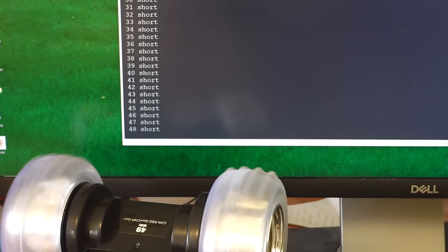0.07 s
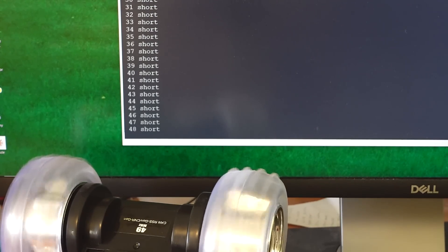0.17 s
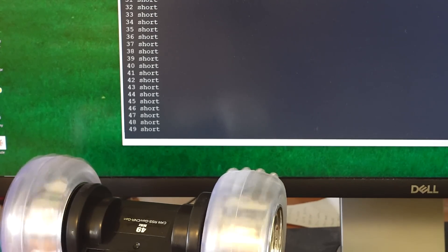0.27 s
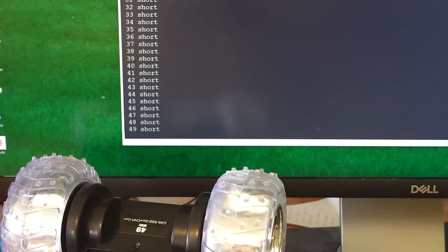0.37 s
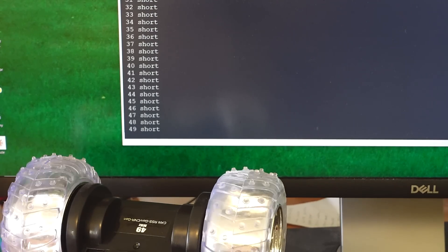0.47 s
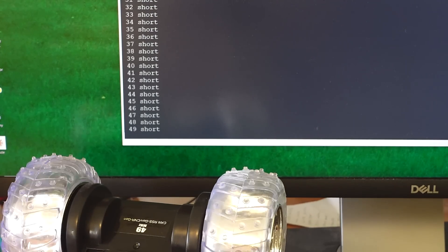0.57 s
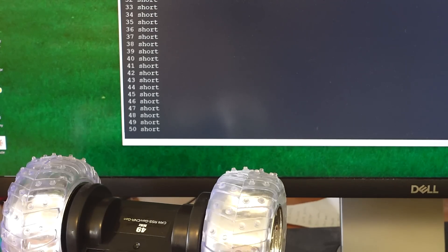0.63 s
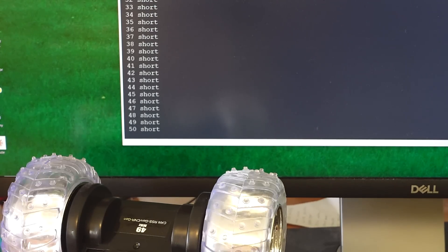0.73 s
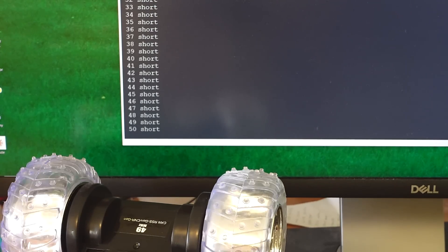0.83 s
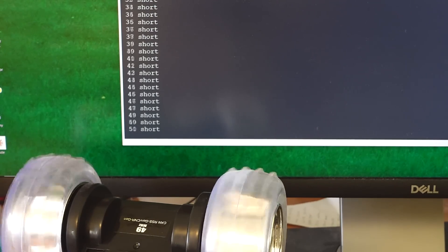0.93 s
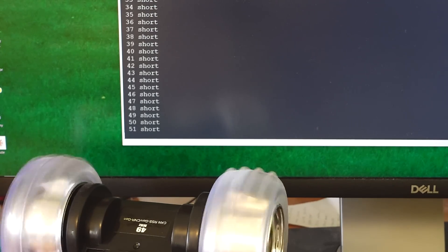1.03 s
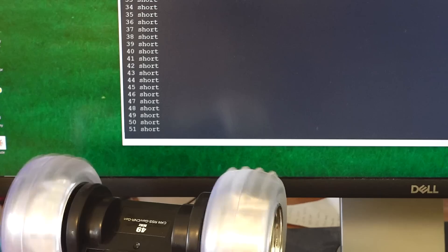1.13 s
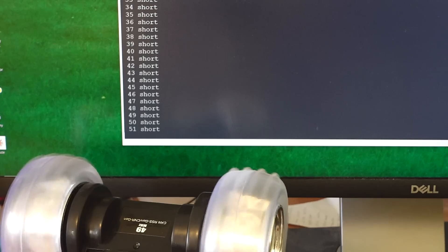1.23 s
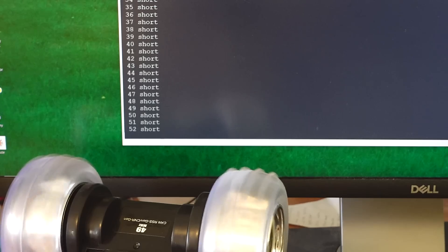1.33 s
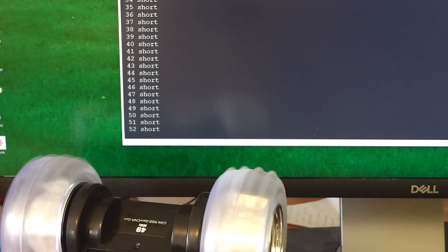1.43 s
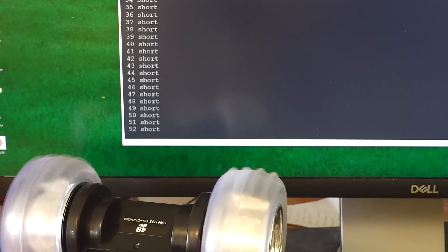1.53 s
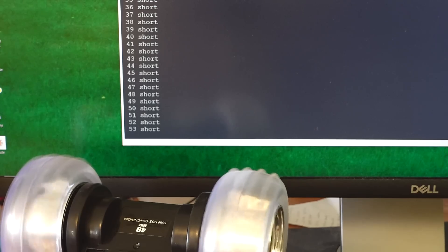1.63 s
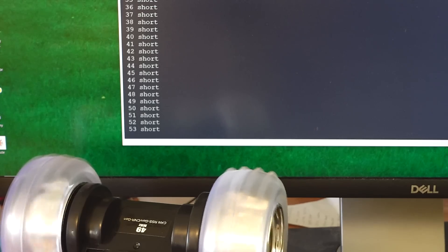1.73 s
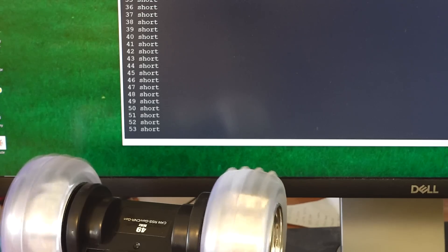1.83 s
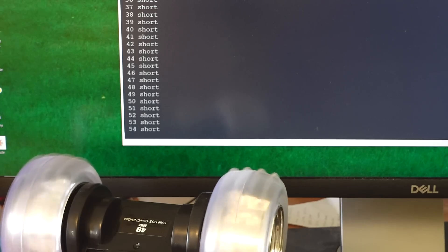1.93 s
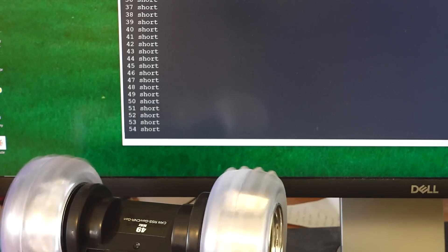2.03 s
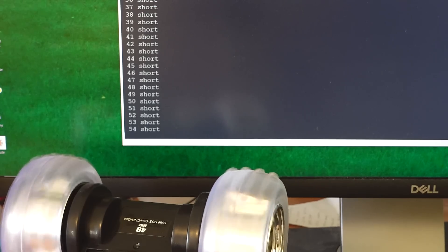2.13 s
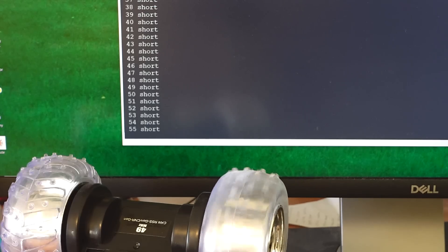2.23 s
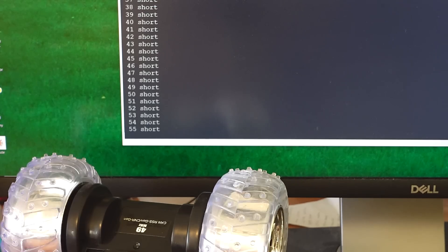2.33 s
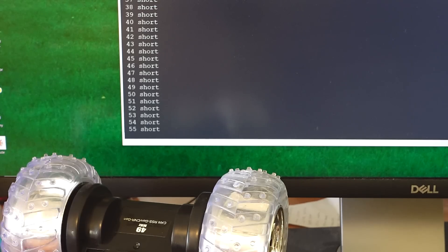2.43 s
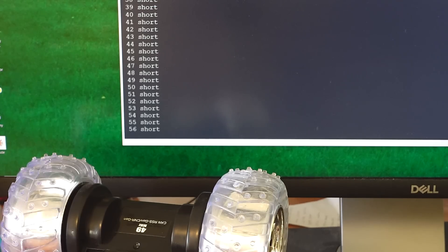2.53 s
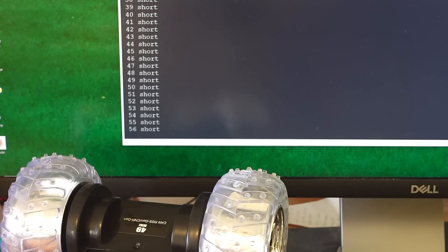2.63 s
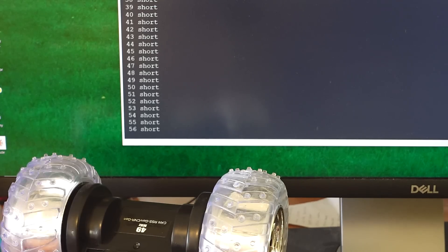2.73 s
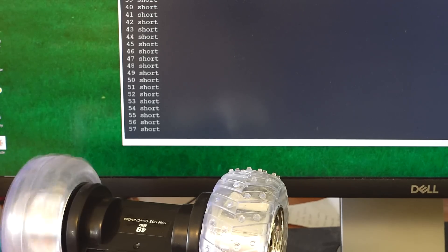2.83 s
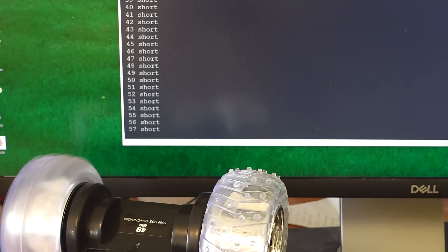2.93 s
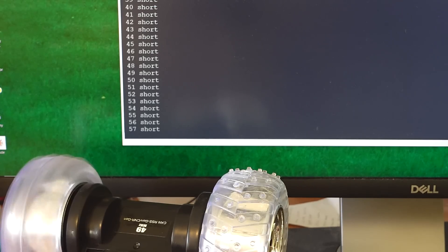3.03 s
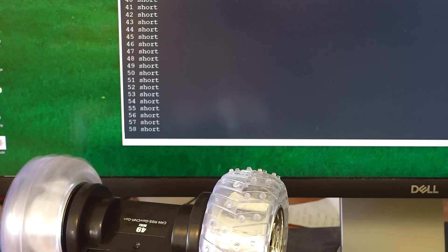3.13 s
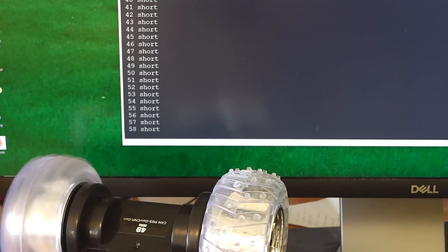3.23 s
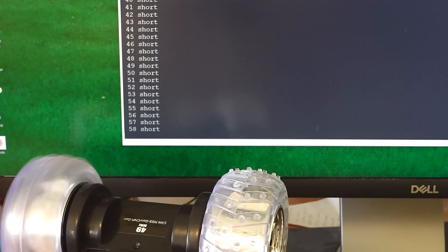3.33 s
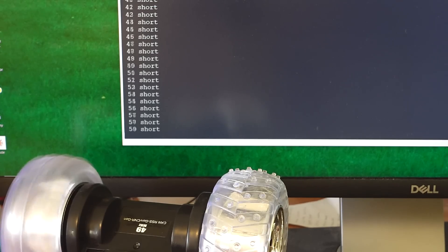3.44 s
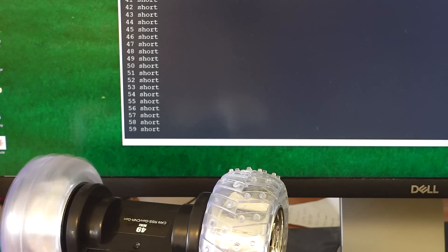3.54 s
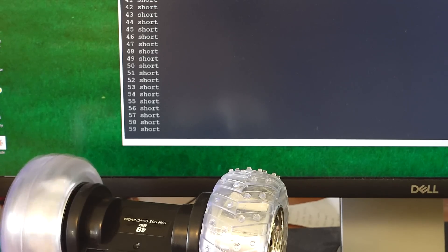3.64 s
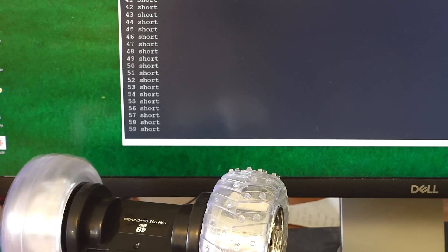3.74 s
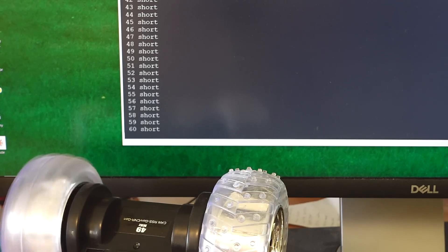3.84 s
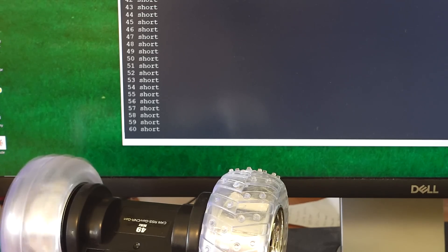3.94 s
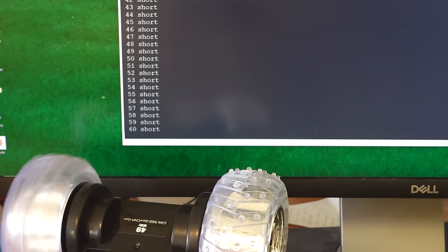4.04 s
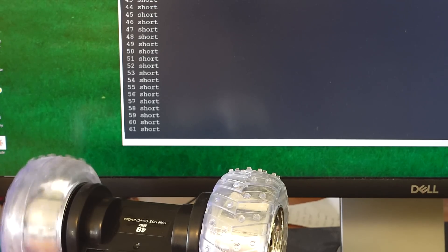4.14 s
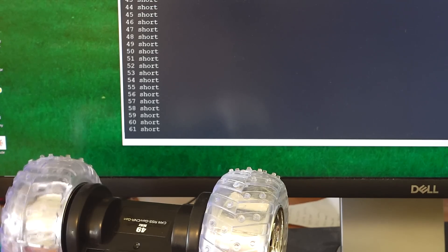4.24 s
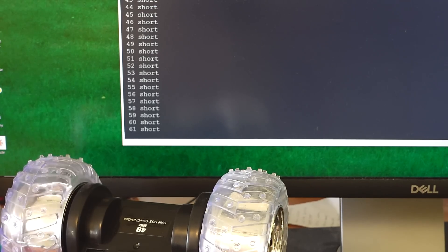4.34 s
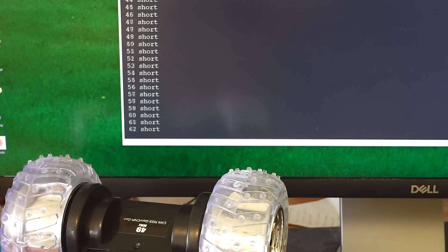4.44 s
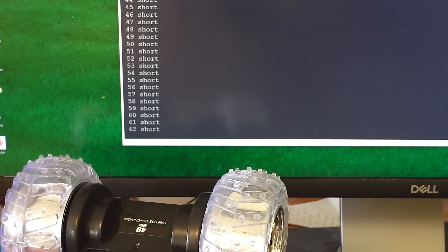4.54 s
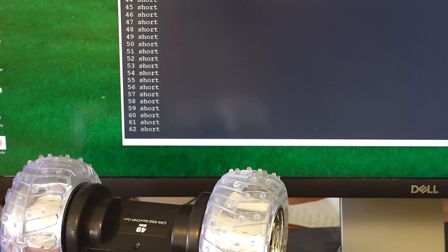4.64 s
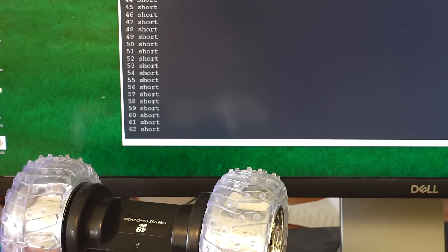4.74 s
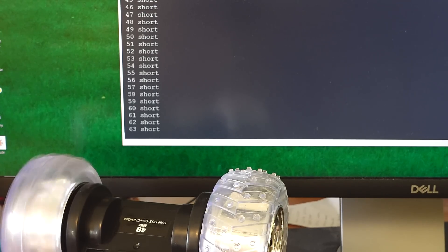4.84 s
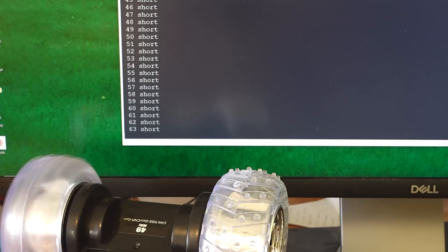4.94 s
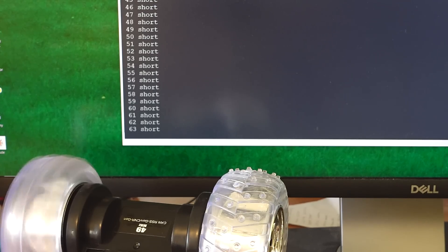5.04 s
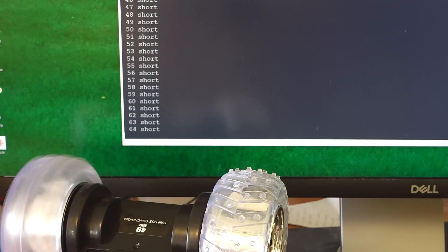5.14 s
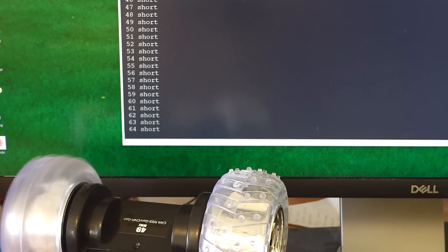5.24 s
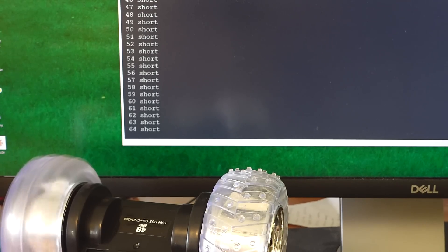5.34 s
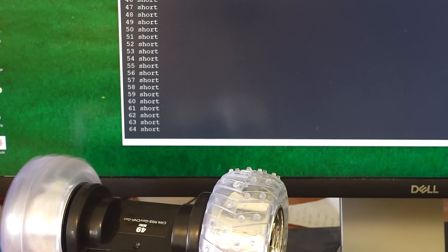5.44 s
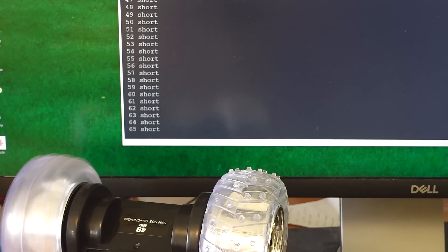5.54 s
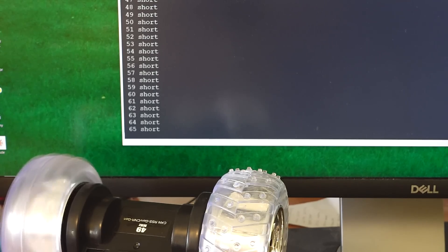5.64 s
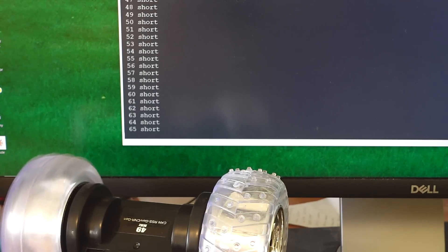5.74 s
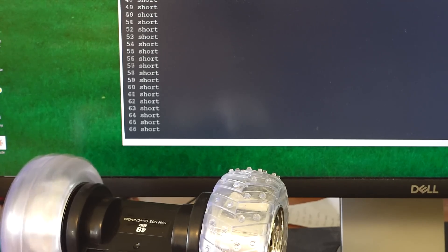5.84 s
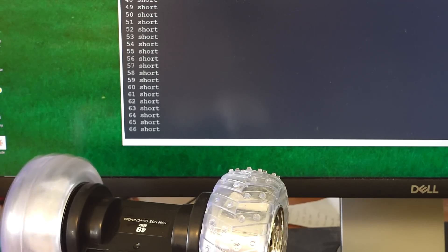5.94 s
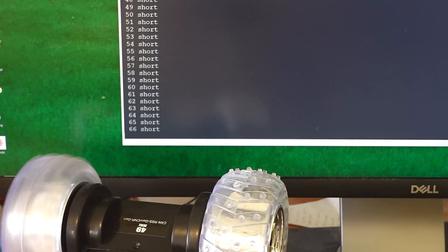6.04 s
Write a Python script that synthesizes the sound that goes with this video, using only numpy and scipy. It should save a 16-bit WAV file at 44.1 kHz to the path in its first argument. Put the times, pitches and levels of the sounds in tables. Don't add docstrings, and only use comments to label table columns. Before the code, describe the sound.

A toy car's small motor and plastic gears whir harshly in bursts, rattling and coasting to a stop, with near-silent pauses in a small room.

```python
import sys
import numpy as np
from scipy import signal
from scipy.fft import rfft, irfft, next_fast_len
from scipy.io import wavfile
from scipy.ndimage import uniform_filter1d, map_coordinates

SR = 44100
rng = np.random.default_rng(int(sys.argv[2]) if len(sys.argv) > 2 else 0)


def decibels_to_gain(level_db):
    exponent = np.asarray(level_db, float) / 20
    return 10 ** exponent


def digitize_waveform(pressure):
    field = np.atleast_2d(pressure).T
    bounded = np.clip(field, -1, 1)
    quanta = np.round(bounded * 32767).astype(np.int16)
    wavfile.write(sys.argv[1], SR, quanta)


N = 268480
T = np.arange(N) / SR


def unit(x):
    return x / np.sqrt(np.mean(x ** 2) + 1e-20)


def along(points, hz):
    f, value = np.transpose(points)
    return np.interp(np.log(hz + 1), np.log(f + 1), value)


def curves(spans):
    s, *columns = np.transpose(np.concatenate(spans))
    gate = sum((T >= rows[0][0]) & (T <= rows[-1][0]) for rows in spans)
    return [uniform_filter1d(gate * 1.0, size=200)] + [np.interp(T, s, c) for c in columns]


def wobble(rate):
    return map_coordinates(rng.standard_normal(int(N * rate / SR) + 4), [T * rate])


def filtered(x, gain, causal=False):
    m = 2 * next_fast_len(N // 2 + 8192)
    g = gain(np.fft.rfftfreq(m, 1 / SR))
    if causal:
        cepstrum = irfft(np.log(g + 1e-6), m)
        cepstrum[1:m // 2] *= 2
        cepstrum[m // 2 + 1:] = 0
        g = np.exp(rfft(cepstrum))
    return irfft(rfft(x, m) * g, m)[..., :N]


def below(f, hz):
    return 1 / (1 + (f / hz) ** 10)


def split(x, edges_hz):
    lows = [filtered(x, lambda f: below(f, hz)) for hz in edges_hz]
    return np.diff([0 * x] + lows + [x], axis=0)


# (time [s], shaft speed [Hz], loudness [dB])
RUNS_BOTH = [
    [(0.0, 126, -22), (0.06, 119, -23), (0.11, 110, -24.5), (0.2, 90, -29), (0.294, 65, -34),
     (0.388, 35, -47), (0.5, 10, -63.5)],
    [(0.954, 30, -49.5), (1.04, 127, -22), (1.15, 173, -19), (1.4, 167, -17.5), (1.88, 169, -17.5),
     (1.98, 121, -18), (2.22, 62, -29.5), (2.31, 39, -48), (2.39, 10, -66.5)],
]
# (time [s], peak level [dB])
KNOCKS_BOTH = [(1.054, -3), (1.094, 4), (1.133, -0.5), (1.173, -0.5), (1.206, -7.5), (1.237, -1),
               (1.269, 2), (1.296, -4), (1.336, -1), (1.362, -6.5), (1.405, 0), (1.473, -9.5), (1.501, -10),
               (1.556, -10), (1.573, -1.5), (1.605, -3), (1.635, -8), (1.665, -6.5), (1.702, -10),
               (1.739, -1.5), (1.787, -8.5), (1.835, -1.5), (1.866, -5), (1.897, -1), (1.935, -4),
               (1.975, -1.5), (2.071, -2)]
# (time [s], peak level [dB])
SLACK_BOTH = [
    (0.977, -13.5),
    (1.003, -8.5),
    (1.023, -9),
    (2.131, -20),
    (2.246, -29),
]
# (frequency [Hz], width [Hz], level [dB])
SHELL_BOTH = [(353, 14, -13.5), (673, 13, -18.5), (994, 74, -1), (1450, 80, -3.5), (1890, 24, 2),
              (1980, 27, -12), (2692, 182, 4.5), (3804, 214, 2.5), (4430, 34, -19), (4870, 100, -5.5),
              (5445, 69, -4.5), (6350, 45, -1), (7880, 200, -44)]
# (frequency [Hz], level [dB per Hz])
BROAD_BOTH = [(15, -86), (25, -80.5), (233, -18), (537, -22.5), (722, -6), (827, -13.5), (1380, 2),
              (1760, -2.5), (2630, 0), (3260, -28), (3830, -14.5), (6390, -6), (15500, -30.5)]
# (offset at full speed [dB], slope [dB per dB loudness], speed slope [dB/octave])
PARTS_BOTH = [(-16.5, 0.63, -1.6), (-5, 1.06, -1.7), (-2.5, 0.92, 3.5)]


def both_wheels():
    body = shell(SHELL_BOTH, BROAD_BOTH, broad_db=-1.0)
    hits = backlash(KNOCKS_BOTH, SLACK_BOTH)
    tooth_load = load(hits, length=0.0018)
    grind = gears(RUNS_BOTH, PARTS_BOTH, body, tooth_load, load_db=1.5, throb_db=2, throb_rate=150, bed_db=-2.5)
    return grind + decibels_to_gain(-8) * knocks(hits, body, rise=0.0046, t60=0.038)


# (time [s], shaft speed [Hz], loudness [dB])
RUNS_ONE = [
    [(2.823, 30, -43), (2.9, 89, -23), (3.0, 184, -19.5), (3.15, 180, -20.5), (3.35, 199, -20),
     (3.82, 202, -19.5), (4.08, 92, -26), (4.12, 74, -36), (4.42, 10, -61)],
    [(4.806, 30, -43), (4.87, 94.7, -24), (5.0, 157.5, -18.5), (5.1, 178, -21), (5.25, 193.2, -20),
     (5.5, 204.5, -20), (5.84, 206.5, -20), (5.97, 167, -22.5), (6.09, 122, -26)],
]
# (time [s], peak level [dB])
KNOCKS_FIRST = [(2.996, 0), (3.055, -4), (3.08, -13), (3.109, -4.5), (3.131, 1), (3.186, -3.5),
                (3.216, -10), (3.231, -5.5), (3.263, -7.5), (3.284, -3.5), (3.309, 0), (3.343, 3),
                (3.37, -7), (3.396, -7), (3.416, -4.5), (3.436, -7), (3.465, -7.5), (3.496, 5.5),
                (3.519, -8), (3.554, -3), (3.57, -9), (3.595, 3.5), (3.637, -12), (3.679, -1.5),
                (3.698, -11), (3.724, -3), (3.784, -1.5), (3.879, 0.5), (3.924, -9.5), (3.963, 7)]
# (time [s], peak level [dB])
SLACK_FIRST = [
    (2.853, -18),
    (2.882, -13),
    (2.914, -8.5),
    (3.998, -14),
    (4.016, -1.5),
    (4.047, -14.5),
    (4.07, -16.5),
    (4.087, -13),
    (4.133, -20),
    (4.173, -21),
]
# (time [s], peak level [dB])
KNOCKS_AGAIN = [(4.846, -21.5), (4.926, -20), (4.978, -17.5), (5.005, -17), (5.086, -14), (5.123, -20.5),
                (5.138, 0), (5.16, -10), (5.188, 6), (5.216, -7), (5.249, -8.5), (5.303, -1), (5.32, -6.5),
                (5.342, -10.5), (5.399, -12), (5.428, -7), (5.49, -3.5), (5.515, -2.5), (5.578, 0.5),
                (5.604, 0), (5.625, -6), (5.647, -7.5), (5.668, -13), (5.685, 1.5), (5.735, -3), (5.773, 0),
                (5.852, -9.5), (5.914, -40), (5.967, -1), (6.054, 0.5)]
# (frequency [Hz], width [Hz], level [dB])
SHELL_ONE = [(233, 17, -25), (732.7, 32, -5.5), (1023, 115, 0), (1378, 96, 3.5), (1602, 80, 3),
             (1902, 67, 6.5), (2230, 260, 4.5), (2660, 260, 5), (3916, 190, 3.5), (4620, 84, -19),
             (5370, 56, -1.5), (6090, 182, 0), (7100, 110, -5), (7780, 42, -14), (7720, 66, -8),
             (8170, 48, -15), (8650, 74, -28), (9160, 282, -8.5)]
# (frequency [Hz], level [dB per Hz])
BROAD_ONE = [(15, -82.5), (25, -48), (156, -27.5), (199, -12), (400, -17), (722, -11), (1240, -10.5),
             (2630, -3), (3260, -2), (3940, -10.5), (4630, -2), (9310, -11.5), (15500, -29.5)]
# (offset at full speed [dB], slope [dB per dB loudness], speed slope [dB/octave])
PARTS_ONE = [(-13.5, 0.56, 2.5), (-3.5, 1.2, 3), (-4.5, 1.09, 6)]


def one_wheel():
    body = shell(SHELL_ONE, BROAD_ONE, broad_db=-7)
    hits = backlash(KNOCKS_FIRST, SLACK_FIRST) + backlash(KNOCKS_AGAIN, [])
    tooth_load = load(hits, length=.0055)
    grind = gears(RUNS_ONE, PARTS_ONE, body, tooth_load, load_db=6.8, throb_db=1.6, throb_rate=110, bed_db=-3)
    return grind + decibels_to_gain(-7.5) * knocks(hits, body, rise=0.0041, t60=0.025)


# (frequency [Hz], level [dB per Hz])
COASTING = [(25, -67), (200, -16), (600, -20), (1200, -0.5), (2600, -1.5), (4000, -4.5), (6500, -6.5),
            (15500, -31)]


def gears(spans, parts, body, tooth_load, load_db, throb_db, throb_rate, bed_db):
    full_db, full_hz = -19, 180
    gate, hz, body_db = curves(spans)
    octaves = np.log2(np.clip(hz / full_hz, .3, 1))
    bass_db, edge_db, hiss_db = (full_db + db + slope * (body_db - full_db) + octave_db * octaves
                                 for db, slope, octave_db in parts)
    contacts_hz = np.clip(1600 * decibels_to_gain(.3 * (body_db + 20)), 150, 4000)
    surge = decibels_to_gain(load_db * tooth_load)
    drive = teeth(contacts_hz, scatter_db=3, rub=0.93) * surge
    ringing = unit(filtered(drive, body, True))
    dull = unit(filtered(rng.standard_normal(N) * surge, lambda f: decibels_to_gain(along(COASTING, f)), True))
    slow = np.pi / 2 * np.clip((-28 - body_db) / 16, 0, .85)
    bands = split(np.cos(slow) * ringing + np.sin(slow) * dull, (850, 3300, 5000))
    mix = 0
    for db, band in zip((bass_db, body_db, edge_db, hiss_db), bands):
        mix = mix + decibels_to_gain(db + throb_db * wobble(throb_rate)) * unit(band)
    return gate * decibels_to_gain(bed_db) * mix


def teeth(rate, scatter_db, rub):
    turns = np.cumsum(rate * decibels_to_gain(4 * wobble(300))) / SR
    strength = decibels_to_gain(scatter_db * rng.standard_normal(N)) * rng.choice([-1, 1], N)
    hits = np.diff(np.floor(turns), prepend=0) * strength
    hits *= np.sqrt(1500 / rate)
    return unit(hits) + rub * rng.standard_normal(N)


def load(rows, length):
    marks = np.bincount([round(row[0] * SR) for row in rows], minlength=N)[:N]
    u = np.arange(2000) / SR / length
    swell = (u * np.exp(1 - u)) ** 2
    return np.clip(signal.fftconvolve(marks, swell)[:N], 0, 1)


def shell(modes, broad, broad_db):
    damped = [(c, w * (1 + (c / 5000) ** 2), db) for c, w, db in modes]

    def peak(f, c, w, db):
        resonance = (f * w) ** 2 / ((c * c - f * f) ** 2 + (f * w) ** 2)
        return decibels_to_gain(2 * db) * resonance * np.exp(-((f - c) / (3 * w)) ** 2)

    def gain(f):
        peaks = sum(peak(f, *mode) for mode in damped)
        return np.sqrt(peaks + decibels_to_gain(2 * (along(broad, f) + broad_db)))

    return gain


def backlash(rows, slack):
    turn_s, faint_db = 0.032, -8.5
    faint = []
    for (s0, db0), (s1, db1) in zip(rows[:-1], rows[1:]):
        turns = int(round((s1 - s0) / turn_s))
        faint += [(s0 + (s1 - s0) * k / turns, min(db0, db1) + faint_db) for k in range(1, turns)]
    s, db = np.transpose(rows + slack + faint)
    chance_db = 3 * rng.standard_normal((len(s), 2))
    dull_db = 0.29 * (db - np.median(db))
    edge_db = -13.5 + dull_db + chance_db[:, 0]
    hiss_db = -16.5 + dull_db + chance_db[:, 1]
    return list(zip(s, db, edge_db, hiss_db))


def knocks(rows, body, rise, t60):
    t = np.arange(1200) / SR
    envelope = decibels_to_gain(-60 * t / t60) * (1 - np.exp(-(t / rise) ** 2))
    parts = np.zeros((3, N + len(t)))
    for s, db, edge_db, hiss_db in rows:
        chatter = unit(rng.standard_normal(len(t))) * decibels_to_gain(db) * envelope
        strengths = decibels_to_gain([[0], [edge_db + 17.5], [hiss_db + 14.5]])
        parts[:, round(s * SR):][:, :len(t)] += strengths * chatter
    norm = np.sqrt(np.mean(body(np.linspace(1, SR / 2, num=2000)) ** 2))
    shares = [lambda f: below(f, 3300),
              lambda f: below(f, 5000) - below(f, 3300),
              lambda f: 1 - below(f, 5000)]
    ring = 0
    for part, share in zip(parts, shares):
        ring = ring + filtered(part[:N], lambda f: body(f) * np.sqrt(share(f)), True)
    return ring / norm


# (time [s], peak level [dB], edge level [dB], hiss level [dB])
TICKS = [(0.0457, -20, -6, -6), (0.0557, -19.5, 5, -7.5), (0.2633, -24, -3.5, -17),
         (0.3955, -20, -10.5, -9), (0.449, -40.5, -5, -7), (0.9552, -34, -14.5, -9),
         (2.8245, -28.5, -14.5, -5), (4.2018, -34, -26, -22), (4.2228, -36, -5, -12),
         (4.2672, -37.5, -8, -8.5), (4.3085, -41, -14, -20.5), (4.359, -33.5, -20, -13),
         (4.807, -27.5, -23.5, -12)]
# (frequency [Hz], level [dB per Hz])
TICK_COLOUR = [(180, -60), (300, -30.5), (663, -6), (1540, 2), (2790, -4), (4010, -6.5), (4350, -13.5),
               (5310, -4), (5860, -17), (6800, -12.5), (7510, -24.5), (9940, -22), (15500, -42)]


def ticks():
    return decibels_to_gain(-5) * knocks(TICKS, lambda f: decibels_to_gain(along(TICK_COLOUR, f)), rise=.0005, t60=.035)


# (shaft speed [Hz], level over loudness [dB])
SHAFT_RINGS = [(150, -54.5), (178, -47), (198, -28), (210, -24.5)]
# (shaft speed [Hz], level over loudness [dB])
BRUSH_RINGS = [(100, -44), (160, -29), (195, -24), (210, -25)]
# (shaft speed [Hz], level over loudness [dB])
MESH_RINGS = [(70, -29), (100, -25.5), (113, -4.5), (135, -14), (165, -9.5), (176, -7.5)]


def motor():
    segments, pinion_teeth = 3, 8
    gate, hz, db = curves(RUNS_ONE)
    first_run = T < RUNS_ONE[1][0][0]
    brush_db = db + along(BRUSH_RINGS, hz) - 7.5 * first_run
    shaft = tone(hz, db + along(SHAFT_RINGS, hz) - 2, waver=.015, flutter_db=2, rate=30)
    brushes = tone(segments * hz, brush_db + 2, waver=.01, flutter_db=4, rate=45)
    mesh_gate, both_hz, both_db = curves(RUNS_BOTH)
    mesh_hz = pinion_teeth * both_hz
    mesh_db = both_db + along(MESH_RINGS, both_hz) - 2.5
    mesh = tone(mesh_hz, mesh_db, waver=.019, flutter_db=3.5, rate=65)
    mesh += tone(2 * mesh_hz, mesh_db - 10.5, waver=.016, flutter_db=4, rate=90)
    return gate * (shaft + brushes) + mesh_gate * mesh


def tone(hz, db, waver, flutter_db, rate):
    phase = 2 * np.pi * np.cumsum(hz * (1 + waver * wobble(rate))) / SR
    return np.sqrt(2) * decibels_to_gain(db + flutter_db * wobble(rate)) * np.sin(phase)


# (frequency [Hz], time to fall 60 dB [s])
TAIL = [(200, .25), (2000, .16), (10000, .09)]
# (frequency [Hz], side minus mid [dB])
SIDE_DB = [(60, -14.5), (110, -13.5), (200, -31), (380, -23), (700, -20.5), (1290, -22), (2380, -14),
           (4400, -14.5), (8120, -12.5), (15000, -14)]


def room(x):
    hz, t, z = signal.stft(rng.standard_normal((2, SR // 2)), SR, nperseg=256)
    decay = decibels_to_gain(-60 * t / along(TAIL, hz)[:, None])
    tail = signal.istft(z * decay, SR, nperseg=256)[1]
    delayed = np.pad(x, (250, 0))[None]
    mid, side = signal.fftconvolve(delayed, tail / np.linalg.norm(tail[0]), axes=1)[:, :N]
    side = filtered(side, lambda f: decibels_to_gain(along(SIDE_DB, f)))
    return decibels_to_gain(-12) * mid + np.array([side, -side])


# (frequency [Hz], level [dB per Hz])
ROOM_AIR = [(15, -56), (25, -37), (96, -11.5), (110, -12), (160, -3.5), (537, -0.5), (598, -1), (649, 0),
            (1200, -2), (1900, -2), (2700, -7.5), (10700, -18.5), (15500, -18)]
# (time [s], level [dB])
ROOM_DB = [
    [(0, -47), (.7, -57.5), (2.6, -54), (4.6, -54.5), (6.09, -58)],
]
# (frequency [Hz], correlation [-1 to 1])
AIR_ALIKE = [(60, 0.48), (240, 0.13), (950, -0.4), (3770, -0.23), (15000, 0.38)]
# (frequency [Hz], level [dB])
WHISTLE = [(14433, -81)]


def air():
    def colour(f):
        turn = np.arccos(np.clip(along(AIR_ALIKE, f), -1, 1)) / 2
        return decibels_to_gain(along(ROOM_AIR, f)) * [np.cos(turn), np.sin(turn)]

    mid, side = filtered(rng.standard_normal((2, N)), colour)
    level = decibels_to_gain(curves(ROOM_DB)[1] + 0.32 * wobble(5.7))
    hush = level * unit(np.array([mid + side, mid - side]))
    return hush + sum(tone(hz, db, waver=.0002, flutter_db=1, rate=30) for hz, db in WHISTLE)


def scene():
    car = both_wheels() + one_wheel() + ticks() + motor()
    direct = car * decibels_to_gain([[-.15], [.15]])
    return direct + room(car) + air()


def low_pass(x):
    return signal.sosfilt(signal.butter(12, 15680, fs=SR, output="sos"), x)


def record(dry):
    soft = dry / (1 + np.abs(dry / .85) ** 8) ** (1 / 8)
    band = filtered(soft, lambda f: (f < 15700) * f ** 2 / (f ** 2 + 35 ** 2))
    return low_pass(band)


dry = scene()
out = record(dry)
digitize_waveform(out)
```